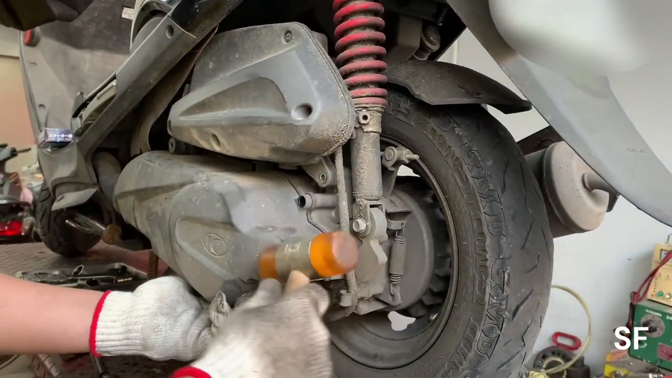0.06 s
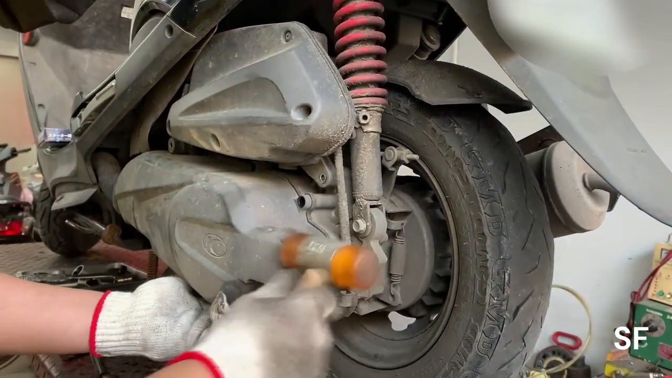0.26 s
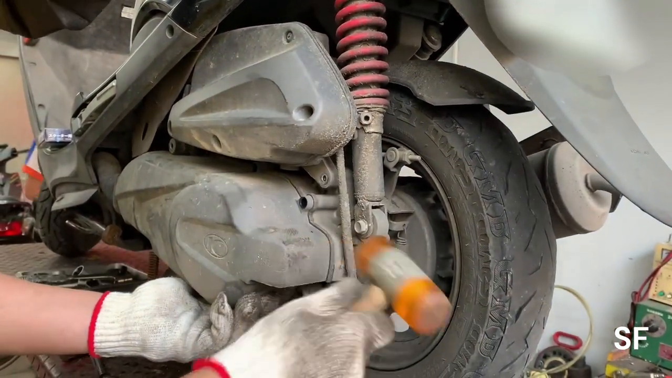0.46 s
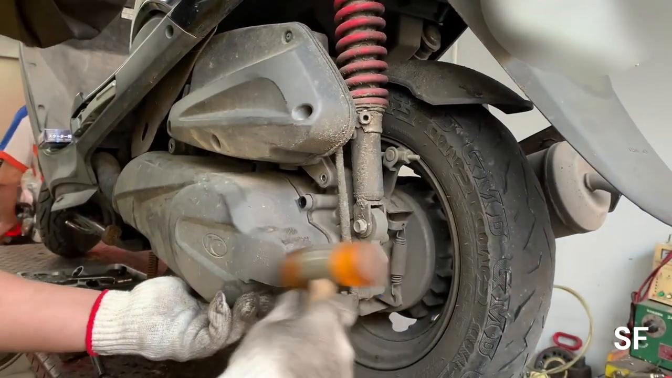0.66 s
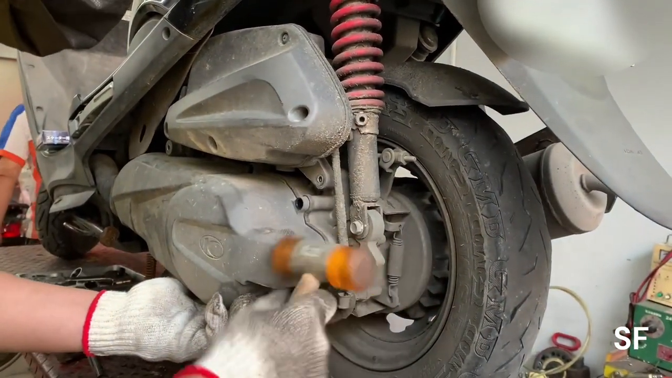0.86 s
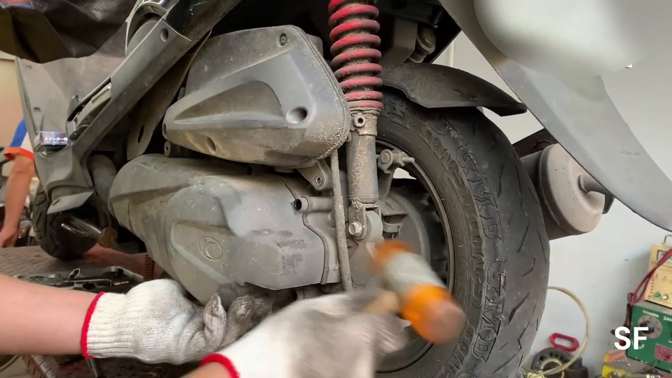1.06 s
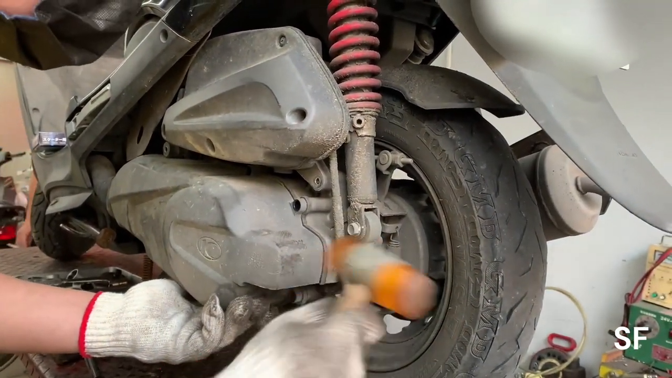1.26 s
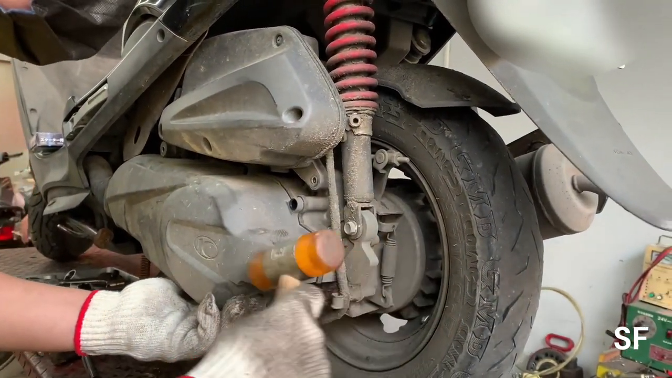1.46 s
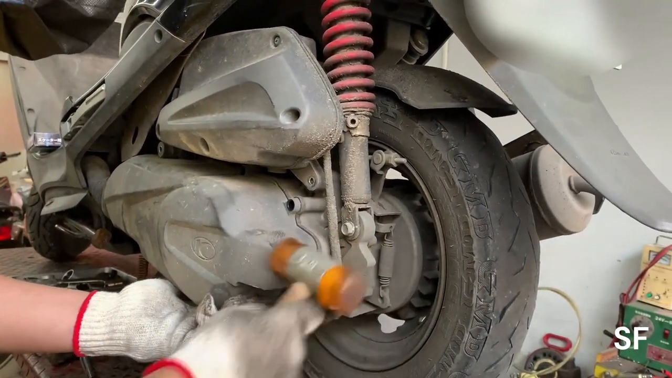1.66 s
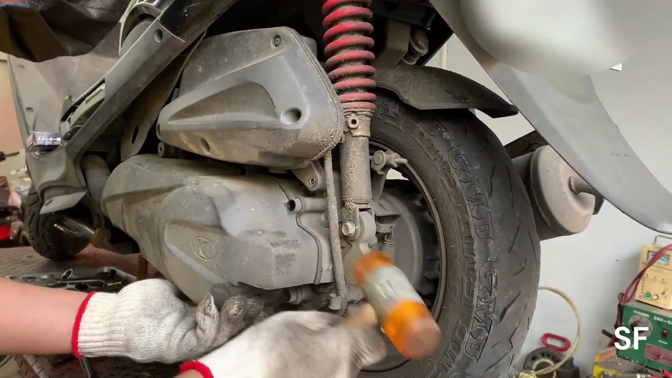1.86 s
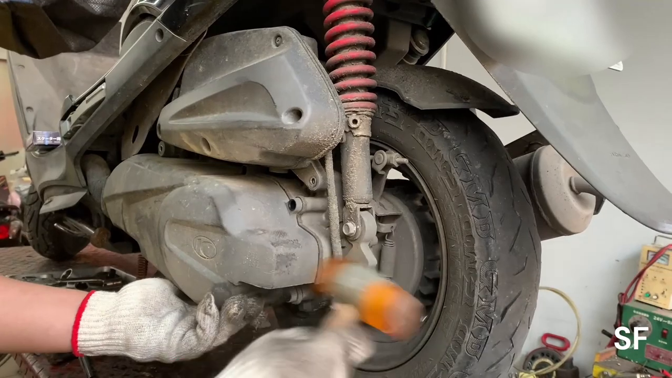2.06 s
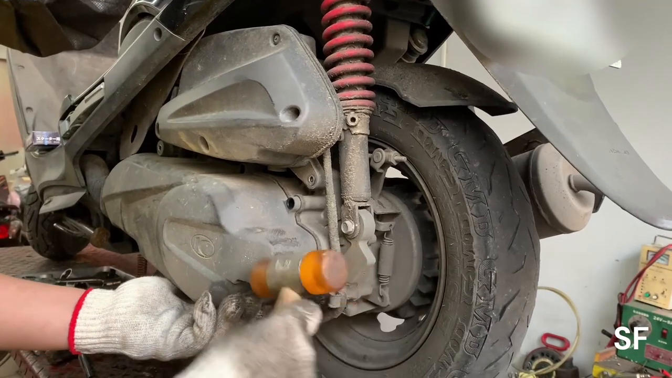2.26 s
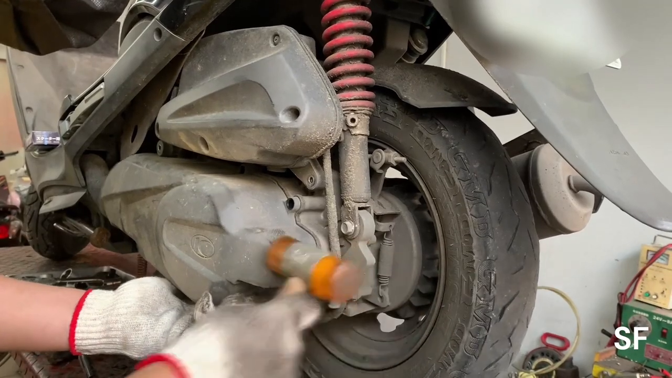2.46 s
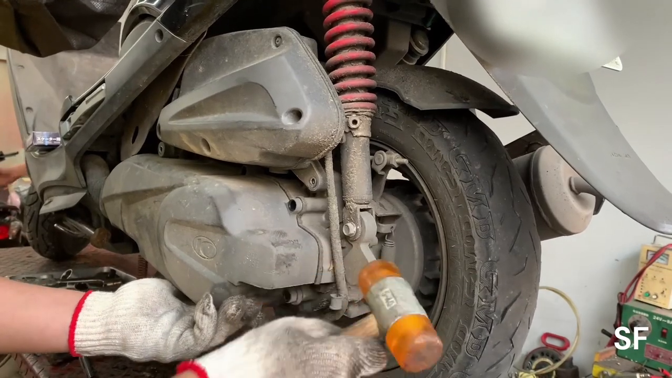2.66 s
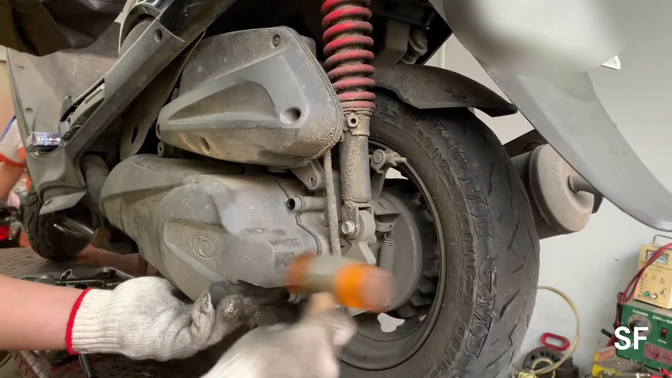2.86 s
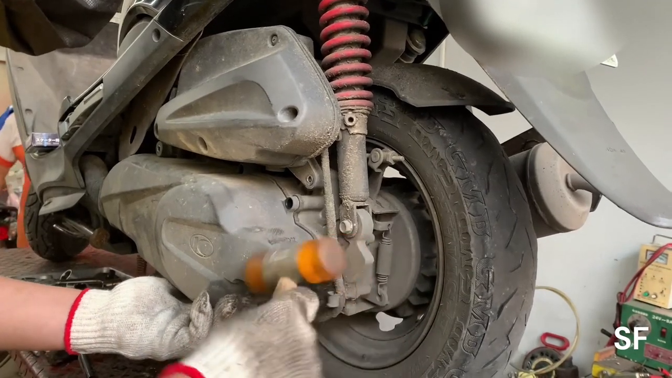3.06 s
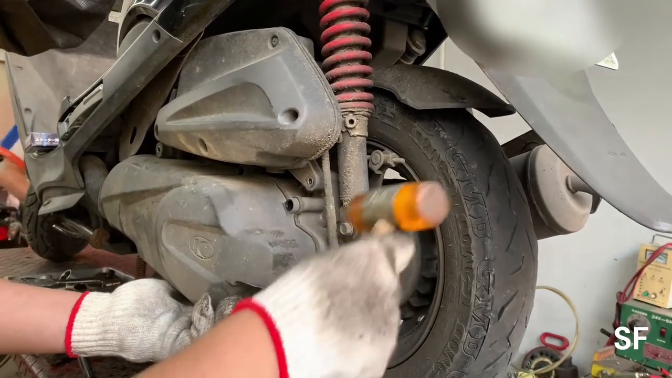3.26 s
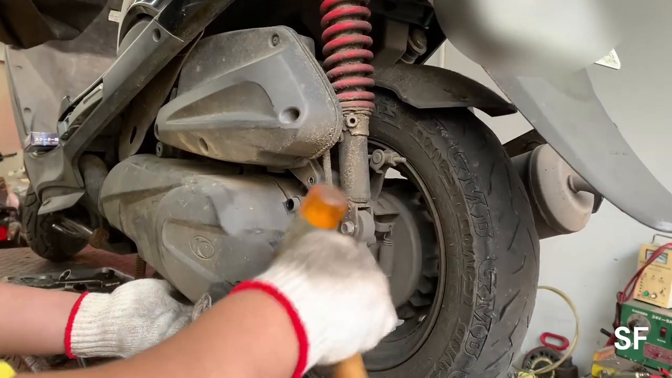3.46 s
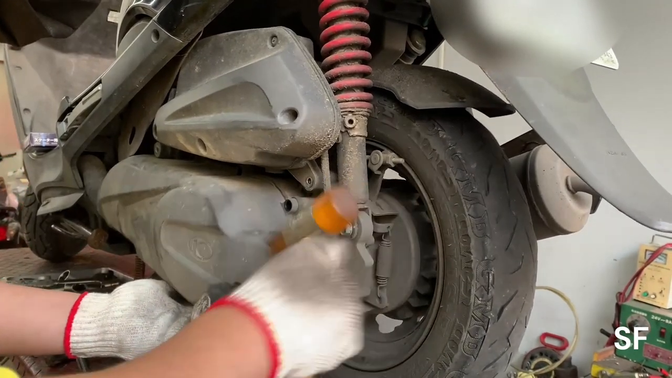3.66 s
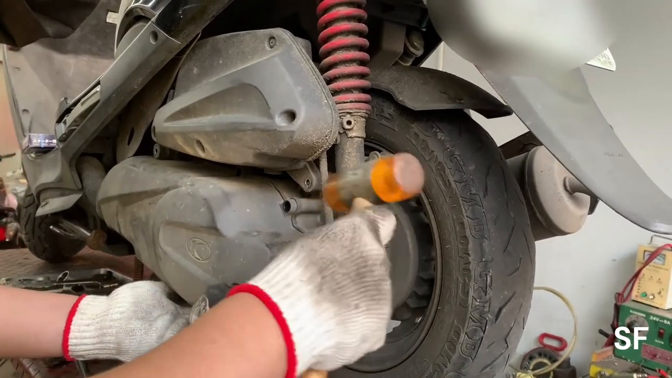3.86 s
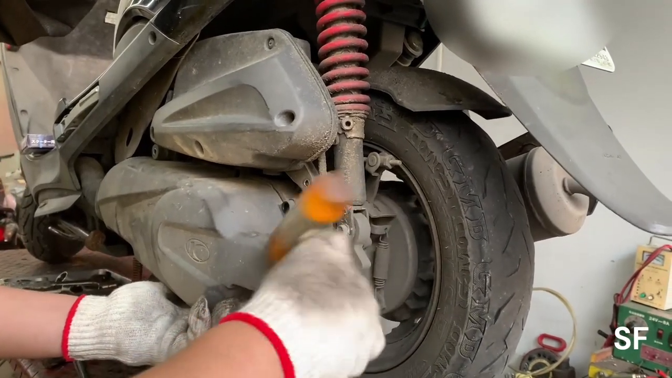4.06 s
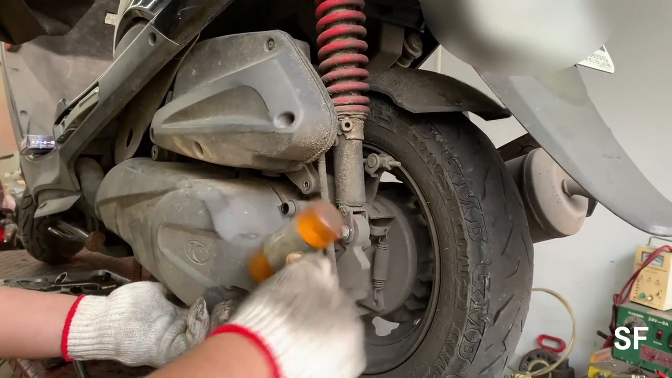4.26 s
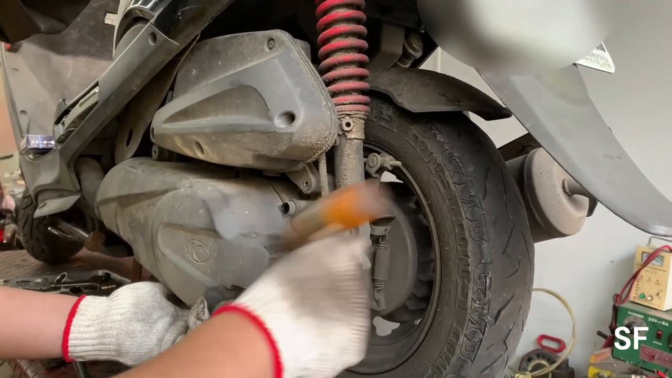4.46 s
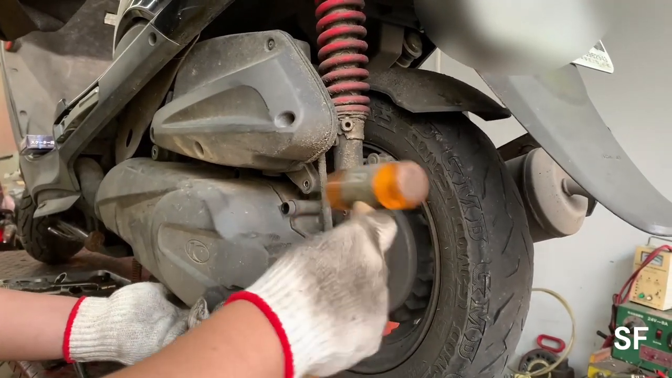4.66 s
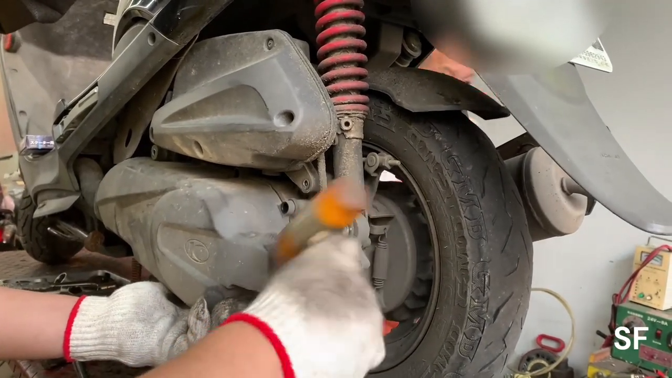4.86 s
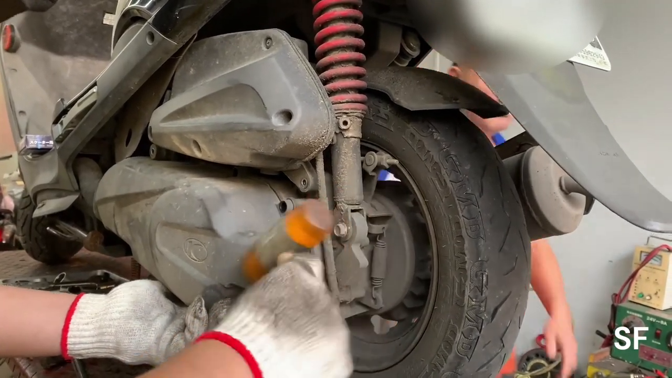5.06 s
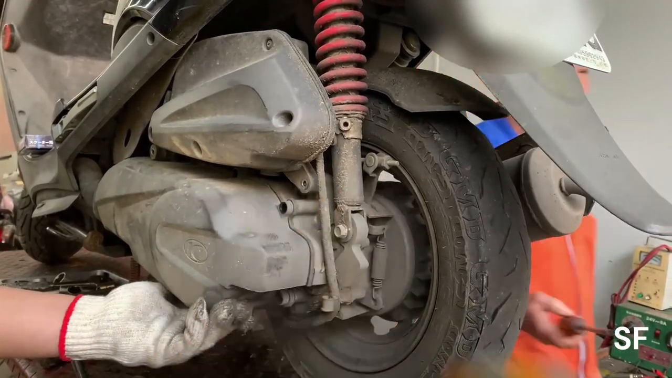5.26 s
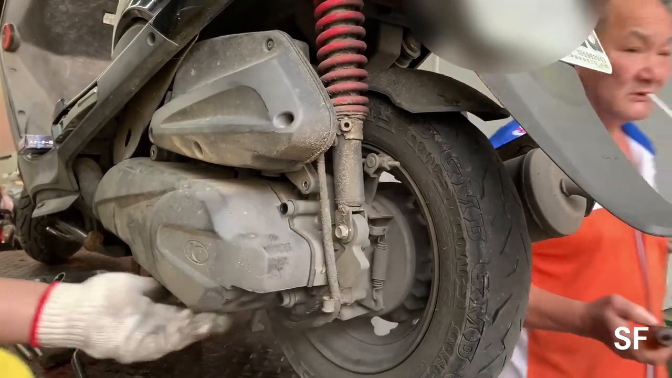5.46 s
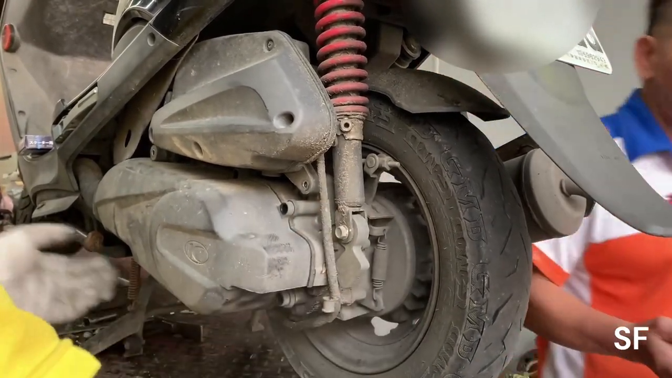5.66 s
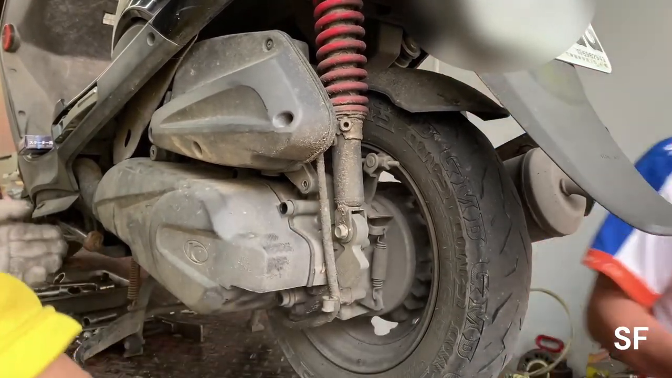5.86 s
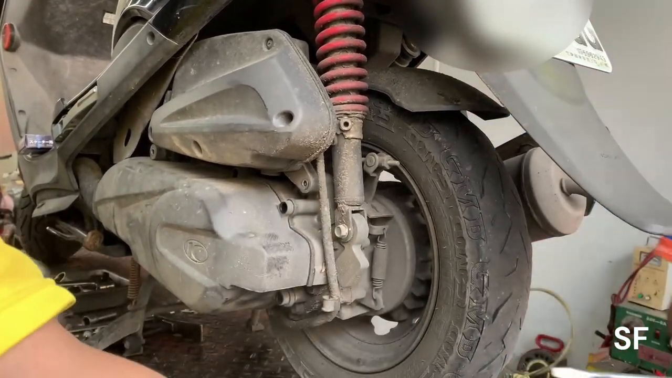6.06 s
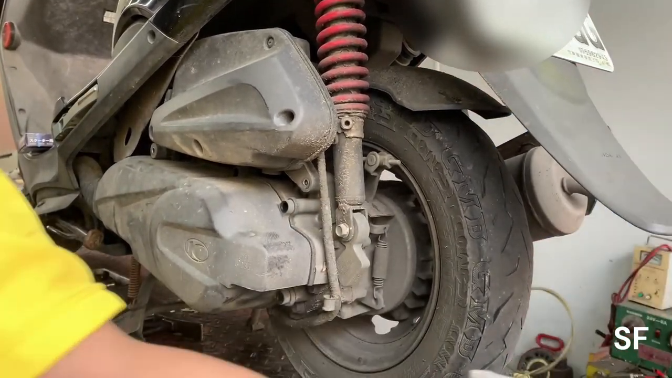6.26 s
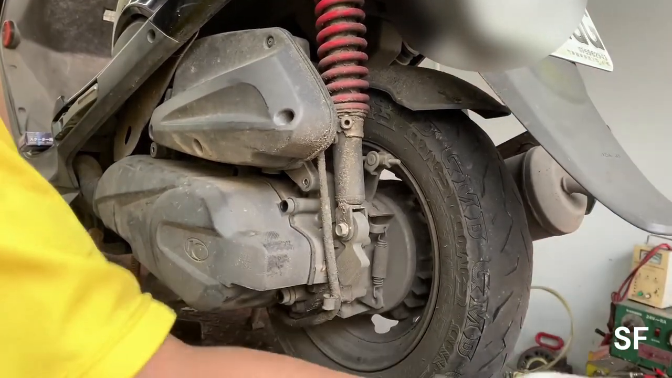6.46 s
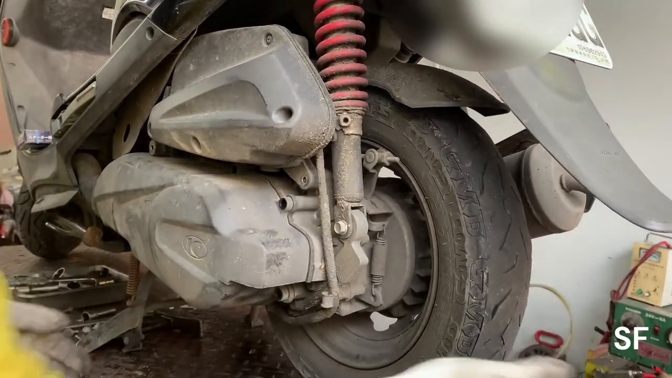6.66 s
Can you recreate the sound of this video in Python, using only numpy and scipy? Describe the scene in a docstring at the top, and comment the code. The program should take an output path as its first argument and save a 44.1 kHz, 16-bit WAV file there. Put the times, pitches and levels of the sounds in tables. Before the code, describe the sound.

Close, boomy mallet knocks on a cast metal casing turn harder and more ringing, then cease; a dropped tool clatters briefly in a quiet workshop.

```python
"""A plastic-faced mallet knocks a scooter's cast transmission cover, first on its face, then nearer its rim.
The cover booms as a sum of decaying modes; shaped noise gives the tick, the buzz of loose parts and the room tail.
A far engine drones as a wavering tone over banded workshop noise; later a tool drops and bounces, ringing briefly.
A phone with two microphone ports stands close by: the ports differ in phase and level, and peaks are limited."""
import sys
import numpy as np
from scipy import signal
from scipy.fft import rfft, irfft, next_fast_len
from scipy.io import wavfile
from scipy.ndimage import uniform_filter1d, minimum_filter1d

SR = 44100
rng = np.random.default_rng(int(sys.argv[2]) if len(sys.argv) > 2 else 0)


def pcm_store(signal):
    """Save signal as 16-bit PCM."""
    levels = np.round(np.clip(np.atleast_2d(signal), -1, 1) * 32767)
    wavfile.write(sys.argv[1], SR, levels.astype(np.int16).T)


N = 295911

# Mallet blows: (time [s], strength [dB], boom [dB re strength], tick [dB re strength],
# thud [dB re strength], spot [0 face - 1 rim])
BLOWS = [(-.03, -4.5, -7, 15, -5, 0.046), (.251, -10, 0.5, 1, 11.5, 0.41),
         (0.532, -8, -3.5, -2, 7.5, 0.033), (.815, -7, -1, -5.5, 7.5, 0.13), (1.1, -11, 2.5, -0.5, 6, 0.2),
         (1.374, -6.5, -2, -1.5, 1.5, 0.25), (1.642, -11, 5.5, -1.5, -1, 0.23),
         (1.907, -9, 1.5, -1, -0.5, 0.12), (2.178, -8.5, 3.5, -2, -2, 0.27),
         (2.448, -6, -0.5, 1.5, -22, 0.16), (2.724, -8.5, 0, 6.5, 3.5, 0.041),
         (2.989, -11.5, 4, -2, 11.5, 0.3), (3.3599, -10, -3.5, -7.5, 1, 0.72),
         (3.656, -13, -3, -5.5, 5, 0.81), (3.9277, -12, -2.5, -5.5, 4, 0.62),
         (4.1936, -8.5, -3, -6.5, 2, 0.65), (4.47, -9, -2, -4, -12, 0.67),
         (4.727, -7.5, -0.5, -3.5, -8.5, 0.65), (4.99, -12, -0.5, -3.5, -6, 0.68)]
BANDS = 35 * 2 ** np.arange(0, 9, 1 / 3)  # third-octave centres [Hz]


def amp(db):
    """Level to amplitude: 20 dB is a factor of ten."""
    return 10 ** (np.asarray(db) / 20)


def at(table, hz, column=1):
    """Interpolation of a table column on a logarithmic frequency axis."""
    rows = np.array(table, float)
    return np.interp(np.log(hz), np.log(rows[:, 0]), rows[:, column])


def fade(t, t60):
    """Exponential decay from t = 0, down 60 dB after t60 seconds."""
    return np.exp(-float(np.log(1000)) * t / t60)


def add(out, sound, s, pan_db=0.):
    """Superposition: mix a sound in at time s, left louder than right by pan_db."""
    i = int(round(s * SR))
    sound = sound[..., max(-i, 0):N - i] * amp(np.array([[pan_db], [-pan_db]]) / 2)
    out[:, max(i, 0):max(i, 0) + sound.shape[-1]] += sound


def walk(rate):
    """Low-pass random fluctuation of unit spread, from smoothed random steps at a rate per second."""
    k = int(SR / rate)
    steps = np.repeat(rng.standard_normal(N // k + 1), k)
    x = uniform_filter1d(uniform_filter1d(steps, k), k)[:N]
    return x / x.std()


def bands():
    """Partial correlation: third-octave noises mixed from mid and side, as bands x channels x samples."""
    # Left-right likeness of the noise: (frequency [Hz], correlation [0 to 1])
    likeness = [(50, 1), (300, 0.68), (1000, 0.093), (2500, 0.18), (5000, 0.2), (7500, 0.12), (8800, 0.98),
                (10800, 0.9), (15000, 0.76)]
    size = next_fast_len(N)
    hz = np.arange(1, size // 2 + 2) * SR / size
    pair = rfft(rng.standard_normal((2, size), dtype=np.float32))
    out = np.empty((len(BANDS), 2, N), np.float32)
    for k, centre in enumerate(BANDS):
        alike = np.clip(at(likeness, centre), 0, 1)
        window = np.clip(1 - 3 * abs(np.log2(hz / centre)), 0, 1)
        filtered = irfft(pair * np.float32(window), size)[:, :N]
        mid, side = filtered * np.sqrt([[1 + alike], [1 - alike]])
        out[k] = mid + side, mid - side
    return out


def ring(hz, db, t60, chance, knock_db, cycles=0.91):
    """Modal synthesis: modes swell over some cycles, so lows come late; much energy drains at once into the frame."""
    t = np.arange(int(.45 * SR), dtype=np.float32) / np.float32(SR)
    pitch, level, phase_shift, port, cluster = np.float32(chance)
    hz = (hz * (1 + 0.00513 * chance[0]))[:, None].astype(np.float32)
    t60 = np.float32(t60)
    swell = 1 - np.exp(-(t * hz / cycles) ** 2)
    beat = 1 + .7 * np.sin(2 * np.pi * 0.01195 * hz * t + 2 * cluster[:, None])  # each mode is a close cluster
    knock_gain = np.float32(amp(knock_db + 3.8 * np.log2(hz / 400)))
    knock_t60 = 0.051 * (hz / 400) ** -.7
    decay = beat * fade(t, t60[:, None]) + knock_gain * fade(t, knock_t60)
    envelope, phase = swell * decay, 2 * np.pi * hz * t
    turn = 0.7 * port * np.clip(hz[:, 0] / 2500, 0, 1)  # each port hears its own phases
    # low modes start nearly together, higher neighbours opposed
    start = np.pi * np.arange(len(hz)) * (hz[:, 0] > 600) + .4 * phase_shift
    start = start + np.outer([1, -1], turn)
    size = amp(db + 1.78 * level)
    cosine_part = size * np.sin(start) @ (envelope * np.cos(phase))
    return size * np.cos(start) @ (envelope * np.sin(phase)) + cosine_part


def blow_tone(hz, boom_db, spot):
    """Spectral balance of a blow: boom below 350 Hz, ring from 600 to 1350 Hz, crack above 2 kHz."""
    ring_db = -3.5
    crack_db = -3.3 + spot * 3.3
    return at([(350, boom_db), (600, ring_db), (1350, ring_db), (2000, crack_db)], hz)


def cover_modes():
    """Modal excitation: the struck spot sets each mode's share; a far wall returns a duller echo."""
    # Cover modes: (nominal frequency [Hz], face-struck level [dB], rim-struck level [dB], t60 [s])
    cover = [(162.5, -9.5, -21, .2), (188, -6, -6.5, 0.19), (218.3, -20.5, -9, 0.46),
             (248.4, -2, -11.5, 0.35), (281.4, 1.5, -10, 0.21), (351, -6, -27, 0.26), (384.9, 4, -2, 0.16),
             (413, -24.5, -12, 0.92), (472.5, -13, -16.5, 0.082), (534, -8, -12, 0.14),
             (614.6, -6.5, -1.5, 0.13), (695, -2.5, -16, 0.13), (770, -10.5, -11.5, 0.24),
             (970, -13, -52.5, 0.031), (1013, -38.5, -3, 0.49), (1062, -8, -22, 0.14),
             (1162, -18.5, -17, 0.86), (1226, -9, -11.5, 0.36), (1303, -12, -19, 0.4),
             (1340, -24.5, -24, 0.55), (1440, -6.5, -2, 0.034), (1631, -8, -8.5, 0.14),
             (1789, -9.5, -3.5, 0.055), (1993, -19.5, -12, 0.29), (2232, -19.5, -9.5, 0.085),
             (2575, -23, -1.5, 0.12), (2954, -29.5, -14, 0.12), (3010, -23.5, -8.5, 0.1),
             (4020, -61, -19.5, 0.29), (6060, -8, -53, 0.01)]
    hz, face_db, rim_db, t60 = np.transpose(cover)
    echo_s = 0.057  # round trip to the far wall
    out = np.zeros((2, N))
    chances = rng.standard_normal((len(BLOWS), 5, len(hz)))
    for (s, strength_db, boom_db, _, _, spot), chance in zip(BLOWS, chances):
        db = face_db + spot * (rim_db - face_db) + blow_tone(hz, boom_db, spot)
        knock_db = 13 - 3 * spot  # prompt energy loss, greater on the face
        modes = amp(strength_db - 8.0) * ring(hz, db, t60, chance, knock_db)
        add(out, modes, s)
        add(out, amp(-25.0) * uniform_filter1d(modes, size=12), s + echo_s)
    return out


def floor_thud():
    """Impulse transmission: a one-sided pressure push arrives through the floor after a short delay."""
    t = np.arange(int(.9 * SR)) / SR
    thud = t / 0.0018 * np.exp(1 - t / 0.00069)  # one push, no swing back
    out = np.zeros((2, N))
    for s, strength_db, _, _, thud_db, _ in BLOWS:
        add(out, amp(strength_db + thud_db) * thud, s + 0.0068)
    return out


def contact_noise(noise):
    """Noise under decaying envelopes: the plastic face ticks, loose parts buzz and the room reverberates."""
    # Tick spectrum: (frequency [Hz], relative density [dB per Hz]), then decay: (frequency [Hz], t60 [s])
    tick_colour, tick_t60 = [(290, -25.5), (500, 4.5), (1500, -6), (2500, -18.5), (3900, -16), (5200, -15),
                             (6800, -11), (8500, -3.5), (10500, -21.5), (13000, 0), (14800, -27),
                             (16400, -36)], [(500, 0.03), (2000, 0.039), (6000, 0.022), (13000, 0.013)]
    # Buzz and room spectrum, struck on the face and at the rim: (frequency [Hz], relative density [dB per Hz])
    buzz_face, buzz_rim = [(60, -17.5), (100, 4.5), (140, -34.5), (250, -10.5), (410, -8), (630, -23),
                           (1200, -12.5), (1550, -25), (3500, -36.5), (7000, -37.5), (9500, -42),
                           (12500, -54.5), (16400, -63.5)], [(60, -33), (100, -16), (245, -9.5), (400, -26), (490, -29.5),
                                              (1000, -13), (1700, -18), (2700, -17), (4500, -27),
                                              (7400, -30.5), (9500, -48.5), (12500, -45), (16400, -52.5)]
    # Decay of the buzz and of the room: (frequency [Hz], t60 [s])
    buzz_t60, room_t60 = [(100, 0.17), (300, 0.4), (1000, 0.17), (3000, 0.18), (8000, 0.12), (14000, 0.48)], [(100, 0.27), (500, 0.94), (2000, 0.92), (6000, 0.79),
                                            (14000, 0.67)]
    t = np.arange(int(.9 * SR)) / SR
    tick = amp(at(tick_colour, BANDS) + 9.0)[:, None] * fade(t, at(tick_t60, BANDS)[:, None])
    tick = tick * (1 - np.exp(-t / 0.00014))
    buzz = fade(t, at(buzz_t60, BANDS)[:, None]) * (1 - np.exp(-t * BANDS[:, None] / 2.0))
    room = amp(-10.0) * fade(t, at(room_t60, BANDS)[:, None]) * (1 - np.exp(-t / 0.0033))
    chatter = amp(3 * walk(180))  # loose parts touch unevenly: 3 dB spread, 180 random steps per second
    contacts = rng.standard_normal((len(BLOWS), len(BANDS)))
    envelope = np.zeros((len(BANDS), N), np.float32)
    for (s, strength_db, boom_db, tick_db, _, spot), contact in zip(BLOWS, contacts):
        rattle = chatter[int(abs(s) * SR):][:len(t)]
        colour = at(buzz_face, BANDS) * (1 - spot) + at(buzz_rim, BANDS) * spot
        colour = colour + blow_tone(BANDS, boom_db, spot)
        touch = amp(tick_db - 2.0 + 3.5 * contact)[:, None]  # every contact has its own colour
        tail = amp(colour + 9.5)[:, None] * (rattle * buzz + room)
        shape = amp(strength_db + 5.0) * (touch * tick + tail)
        i = int(round(s * SR))
        envelope[:, max(i, 0):i + len(t)] += shape[:, max(-i, 0):]
    return np.einsum("bn,bcn->cn", envelope, noise)


def mallet(noise):
    """Impact response as a sum of modal ringing, floor-borne push and contact noise."""
    return cover_modes() + floor_thud() + contact_noise(noise)


def drone():
    """Periodic excitation: a far engine's firing tone and its octave, wavering in pitch and level."""
    # Course of the engine's level: (time [s], level [dB])
    level = [(0, -27), (.5, -49), (0.802, -31), (1.101, -74), (2.1, -52), (2.4, -36.5), (3, -31.5),
             (3.6, -31), (3.8, -35), (4.4, -35), (4.599, -47), (5.8, -49), (6.3, -54), (6.71, -65.5)]
    s, db = np.transpose(level)
    firing_hz = 73.6
    phase = 2 * np.pi * np.cumsum(firing_hz * (1 + .008 * walk(5))) / SR
    tone = np.sin(phase) + amp(-16.0) * np.sin(2 * phase)
    return tone * amp(np.interp(np.arange(N) / SR, s, db) + 1.3 * walk(6))


def shop(noise):
    """Coloured noise with a changing level: the workshop's rumble and hiss, each band flickering a little."""
    # Background spectrum: (frequency [Hz], relative density [dB per Hz])
    spectrum = [(15, -52), (25, -6.5), (65, 0), (102, -3.5), (191, -3), (213, -12.5), (244, -11.5),
                (703, -17.5), (1970, -23.5), (8770, -45), (9510, -51.5), (14700, -50.5), (16400, -67)]
    # Course of the background: (time [s], level [dB])
    level = [(0, -33.5), (1.5, -37.5), (3, -36), (4.5, -37.5), (5.4, -44.5), (6.2, -44.5), (6.71, -46.5)]
    out = 0
    for hz, band in zip(BANDS, noise):
        # each band's noise runs backwards in time
        out = out + amp(at(spectrum, hz) + 2.04 * walk(24)) * band[:, ::-1]
    s, db = np.transpose(level)
    return out / out.std() * amp(np.interp(np.arange(N) / SR, s, db))


def tool(noise):
    """Repeated impact: each bounce ticks, clacks with a close echo tail and excites modes; clean rebounds ring."""
    # Bounces: (time [s], strength [dB], bounce [0 dull tumble - 1 ringing rebound], tick [dB re strength])
    drops = [(5.614, -28.5, .05, -45), (5.627, -33, .2, -10), (5.638, -48, .05, -33), (5.652, -39, .1, -31),
             (5.699, -25.5, 0.83, -47), (5.78, -24.5, 1, -37), (5.792, -36, .45, -18),
             (5.901, -27.5, 0.83, -43), (5.938, -36, .65, -35)]
    # Tool modes: (nominal frequency [Hz], relative level [dB], t60 [s])
    modes = [(650, 3, 0.024), (877, -4.5, 0.035), (978, 3, 0.058), (1325, -1.5, 0.022), (1470, -16, 0.017)]
    # Clack spectrum: (frequency [Hz], relative density [dB per Hz])
    clack = [(88, -32), (150, -16.5), (433, -15.5), (968, -15.5), (1820, -26), (3750, -32), (5040, -43),
             (6500, -39.5), (9820, -55), (13700, -66), (16400, -80)]
    hz, db, t60 = np.transpose(modes)
    tick_hz, tick_t60, pan_db = 5600, 0.064, -1
    out, t = np.zeros((2, N)), np.arange(int(.2 * SR)) / SR
    decay = fade(t, 0.026) + amp(0.5) * fade(t, 0.36)  # dry clack, then echo tail
    chances = rng.standard_normal((len(drops), 5, len(hz)))
    for (s, strength_db, bounce, tick_db), chance in zip(drops, chances):
        bright_db = -5.5 + bounce * 6.5  # spectral tilt, dB per octave
        ring_db = -21 * (1 - bounce)
        ringing = ring(hz, db + ring_db, t60, chance, knock_db=-26.0, cycles=2.1)
        add(out, amp(strength_db + 0.2) * ringing, s, pan_db)
        colour = amp(at(clack, BANDS) + bright_db * np.log2(BANDS / 500))
        i = int(s * SR)
        burst = noise[:, :, i:i + len(t)]
        tick = burst[abs(np.log2(BANDS / tick_hz)) < .6].sum(axis=0) * fade(t, tick_t60)
        add(out, amp(strength_db + tick_db) * tick, s, pan_db)
        add(out, amp(strength_db + 9.5) * decay * np.tensordot(colour, burst, axes=1), s, pan_db)
    return out


def scene():
    """Superposition of mallet, engine, workshop and tool."""
    noise = bands()
    return mallet(noise) + drone() + shop(noise) + tool(noise)


def record(dry):
    """Linear port filtering with a bass roll-off, then look-ahead gain reduction at peaks and a steep low-pass."""
    # Phase between the ports: (frequency [Hz], left lead [rad])
    port_phase = [(100, 0), (1300, -.1), (4000, -.6), (6500, -1.4), (8700, -np.pi), (10700, -np.pi),
                  (11600, -5.6), (16000, -6.2)]
    # Level between the ports: (frequency [Hz], left minus right [dB])
    port_balance = [(30, 1.5), (70, 3.2), (200, 2), (400, 1.5), (650, 4), (1300, 1), (2400, 2.2), (4400, 3),
                    (8000, 0), (15000, 0)]
    size = next_fast_len(N + 512)
    hz = np.arange(1, size // 2 + 2) * SR / size
    side = np.array([[.5], [-.5]])  # each port takes half the difference
    ports = amp(side * at(port_balance, hz)) * np.exp(1j * side * at(port_phase, hz))
    ports = ports / (1 - 1j * 120.0 / hz)  # first-order high-pass at 120 Hz
    wet = irfft(rfft(dry, size) * ports, size)[:, :N]
    need = np.minimum(amp(-1.3) / (abs(wet).max(axis=0) + 1e-9), 1)
    gain = uniform_filter1d(minimum_filter1d(need, size=120), size=120)
    low_pass = signal.ellip(10, .1, 80, 16300, fs=SR, output="sos")
    return signal.sosfilt(low_pass, wet * gain)


dry = scene()
out = record(dry)
pcm_store(out)
```